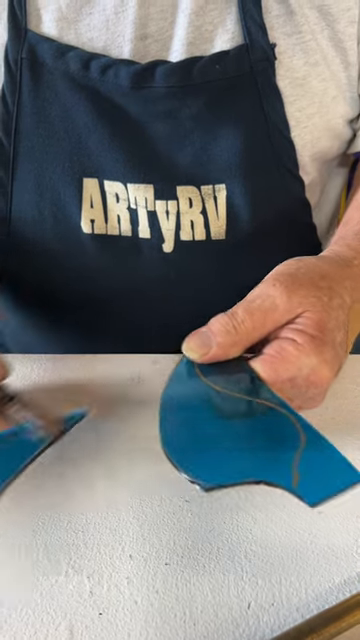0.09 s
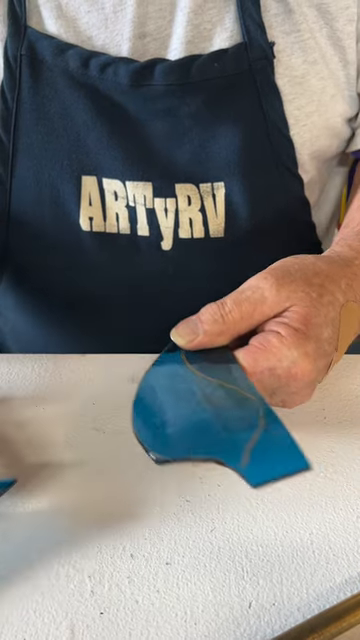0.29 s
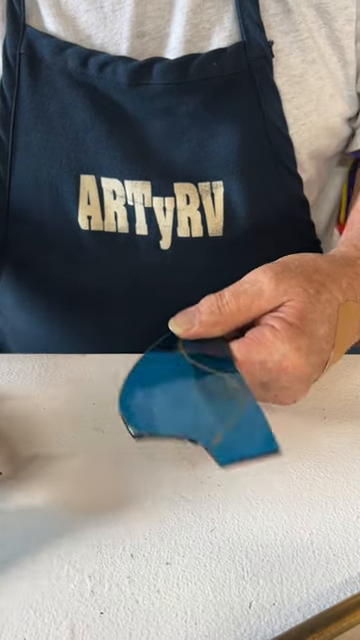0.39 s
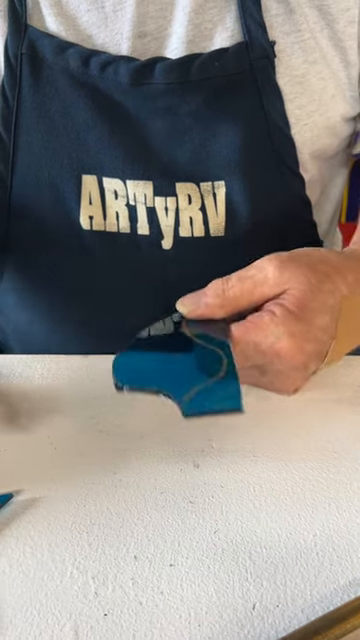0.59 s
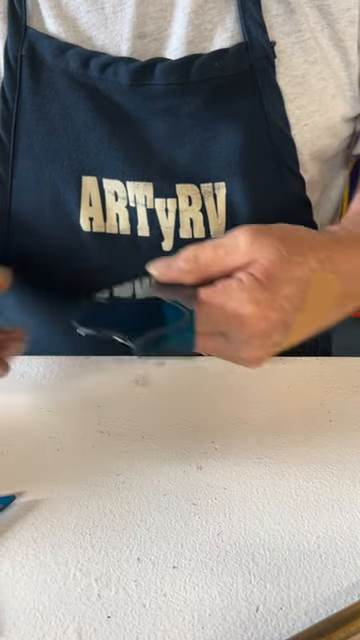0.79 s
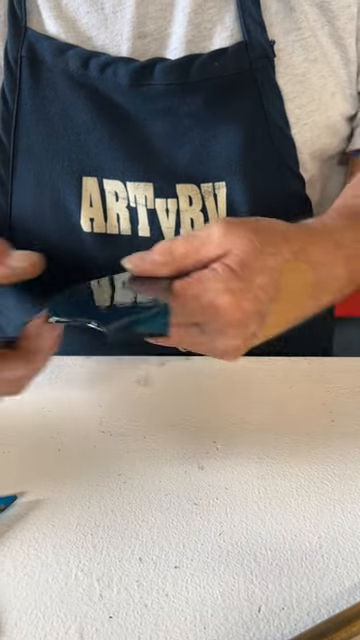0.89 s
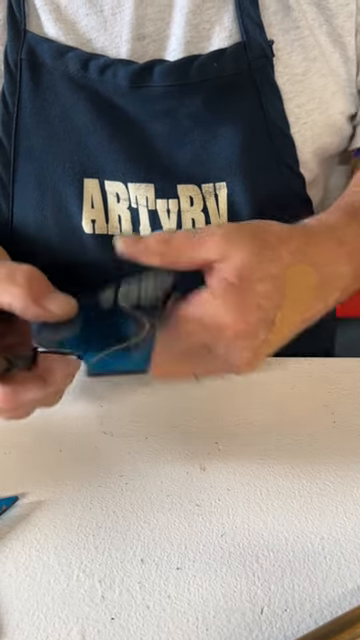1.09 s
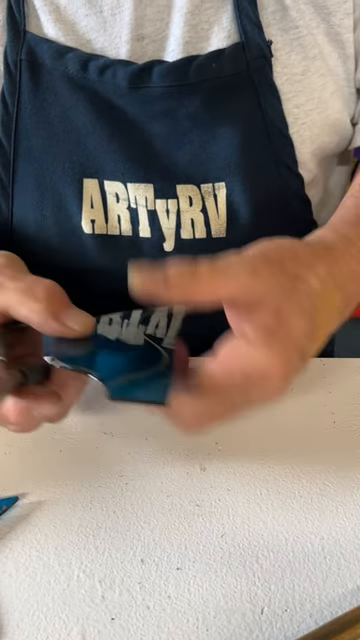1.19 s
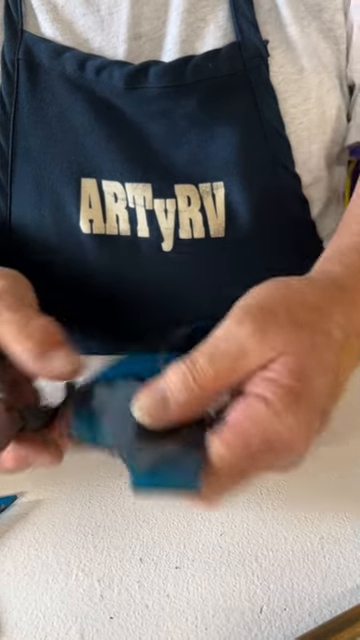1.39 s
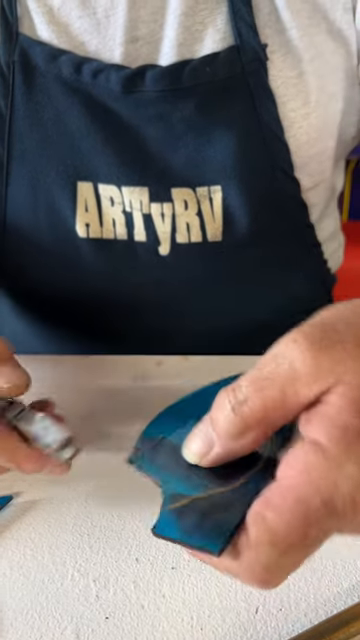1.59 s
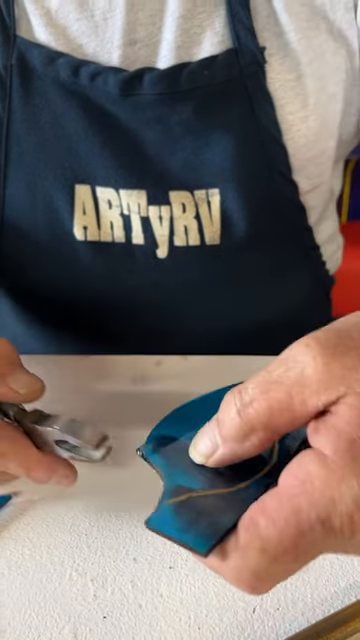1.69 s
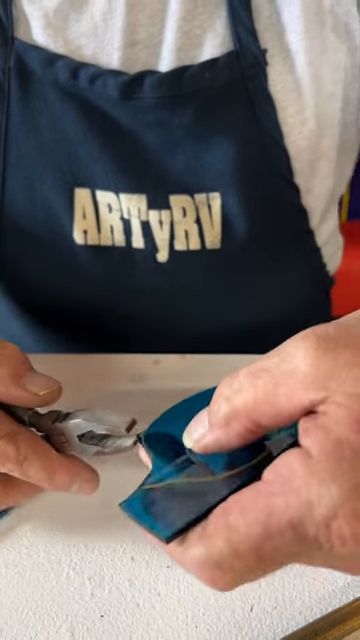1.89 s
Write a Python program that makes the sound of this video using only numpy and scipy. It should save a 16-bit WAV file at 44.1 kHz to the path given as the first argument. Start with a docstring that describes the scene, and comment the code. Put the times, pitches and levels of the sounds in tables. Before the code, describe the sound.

A piece of glass clatters onto a table, ringing and rattling, then pliers tick faintly.

```python
"""A live studio with a low hum. A snapped-off piece of sheet glass is put down on a work table: it lands,
rocks, chatters and settles. Each contact cracks, knocks the table and rings the glass in high modes; between
contacts the edge drags. Then fingers slide over the other piece with a soft hiss, it is tapped once, and the
pliers tick and squeak. A few faint contacts close the scene. Hands, tools and the room reflect the sound."""
import sys
import numpy as np
from scipy import signal
from scipy.fft import rfft, irfft, next_fast_len
from scipy.io import wavfile
from scipy.ndimage import uniform_filter1d, map_coordinates

SR = 44100
rng = np.random.default_rng(int(sys.argv[2]) if len(sys.argv) > 2 else 0)


def wav_record(signal):
    """Record a signal, one row per channel, as 16-bit PCM in the file named by sys.argv[1]."""
    frames = np.transpose(np.atleast_2d(signal))
    bounded = np.clip(frames, -1, 1)
    # unit amplitude maps onto the largest positive 16-bit level
    quanta = np.round(bounded * 32767).astype(np.int16)
    wavfile.write(sys.argv[1], SR, quanta)


N = 83790

# noise spectra: freq_hz, density_db
HUM_SPECTRUM = [(15, -59), (25, -24.5), (75, -7.5), (117, -8.5), (244, -16), (310, -23.5), (388, -33.5),
                (605, -32.5), (1500, -45.5), (1950, -81), (3300, -120)]
SLIDE_TREBLE = [(6000, -30), (6600, -15), (7300, -10.5), (7550, -7), (7900, -4.5), (8400, -10.5),
                (8900, -2), (9500, -13.5), (10400, -9.5), (10880, -7.5), (11300, -17.5), (12500, -40.5)]
SLIDE_MIDDLE = [(710, -49.5), (1200, -22), (2070, -3), (2990, -8.5), (3610, -7), (4080, -7), (6500, -11.5),
                (8450, -51)]
CRACK_SPECTRUM = [(400, -7), (1500, -6), (4000, -2.5), (9000, -1.5), (12000, -2), (16000, -17.5)]
# fingers on glass and cloth: time_s, treble_db, middle_db
SLIDE_LEVELS = [(0, -88, -87), (0.199, -80, -76.5), (.9, -89, -74), (0.999, -93, -87), (1.04, -67, -72),
                (1.2, -74.5, -74.5), (1.36, -76.5, -75), (1.389, -86, -76), (1.5, -83.5, -75),
                (1.58, -93.5, -83.5), (1.74, -90, -82.5), (1.755, -82.5, -71), (1.82, -78, -73.5),
                (1.9, -67, -67.5)]
# pliers: centre_s, half_length_s, pitch_hz, level_db
SQUEAKS = [(.01, .03, 2350, -79), (0.215, 0.0056, 2340, -69.5), (1.033, 0.035, 3850, -68.5),
           (1.481, 0.058, 4990, -79), (1.811, 0.04, 4970, -64.5)]
# tool on glass: start_s, click_gain_db, ring_hz, ring_db, t60_s, click_width_oct
TICKS = [(0.094, -45, 2270, -48.5, 0.058, 2.5), (0.096, -63, 14340, -62, 0.048, .6),
         (.203, -61.5, 5580, -63, 0.039, .6), (1.055, -45.5, 4784, -61, 0.017, 1.5),
         (1.221, -49, 3560, -56.5, 0.016, 0.53), (1.443, -55, 2615, -67.5, 0.026, 1.33),
         (1.752, -50, 7290, -48, 0.011, 1.9)]
# dragging edge: time_s, level_db
SCRAPE_LEVELS = [(0.236, -52.5), (.247, -36.5), (0.261, -34), (0.271, -26.5), (.29, -47.5), (.32, -43),
                 (0.334, -36), (0.388, -28.5), (.425, -30.5), (0.441, -49), (0.471, -55.5), (0.489, -32.5),
                 (.52, -40), (0.549, -27.5), (0.598, -37), (0.641, -53.5)]
# glass meets table: start_s, crack_db, thud_db, knock_db, low_db, main_db, high_db, t60_ratio, rise_ms
CONTACTS = [ (0.2379, -5.5, -21, -36.5, -31.5, -36.5, -29.5, 0.44, 0.2),
            (0.245, -27, -40, -42, -31.5, -26, -34, 0.97, 1.5),
            (0.2609, -16.5, -38.5, -34, -27, -23.5, -24, 0.67, 2),
            (0.2653, -6, -27, -38, -24.5, -13, -14, 0.53, 0.73),
            (0.2683, -12.5, -40, -35.5, -21, -17.5, -12.5, 0.21, 1.3),
            (0.2729, -11.5, -28.5, -25.5, -32.5, -28, -20.5, 0.23, 0.2),
            (0.3066, -40, -49.5, -45, -42.5, -33.5, -40, 0.35, 1.1),
            (0.3185, -36, -53, -43.5, -43.5, -32.5, -37.5, 0.44, 1.2),
            (0.328, -15, -45, -30, -35.5, -21, -24.5, 0.65, 0.17),
            (.3370, -19.5, -43, -30, -29, -22, -25.5, 0.76, 0.63),
            (0.359, -20, -36, -36, -41.5, -19.5, -22.5, 0.54, 0.22),
            (.3750, -5, -39.5, -22.5, -22.5, -21, -26, 0.41, 0.12),
            (.3880, -13.5, -36, -29.5, -33, -17, -20, 0.62, 0.37),
            (.3990, -20, -42, -36, -26.5, -20, -21, 0.67, 0.66),
            (0.414, -14.5, -39.5, -33, -33.5, -20.5, -25, .8, 0.28),
            (0.423, -20, -48.5, -39, -39, -24.5, -26, 0.38, 0.93),
            (.4300, -32, -44.5, -46, -45, -26.5, -35.5, 0.6, 0.93),
            (0.474, -10, -32.5, -22, -30, -31.5, -30, 0.34, 0.086),
            (0.4814, -1, -42, -35, -23.5, -20.5, -15, 0.13, 0.46),
            (0.4858, 4, -37.5, -36, -23, -14, -11, 0.26, 1.25),
            (.4970, -31, -37.5, -45, -27, -24, -26, 1, 0.64),
            (0.529, -26.5, -50.5, -38, -31, -35.5, -28, .6, .3),
            (0.5339, -4.5, -25, -17.5, -22.5, -30, -26.5, 0.55, 0.26),
            (0.55, -16.5, -35, -30.5, -30, -27.5, -30, 0.34, 0.15),
            (.5760, -16, -43.5, -32, -36.5, -50.5, -33.5, 0.27, 0.59),
            (.5960, -27.5, -39, -31, -42.5, -61, -36.5, .5, 0.38),
            (0.616, -23.5, -41, -41.5, -55, -55, -34.5, 0.15, 0.31),
            (1.836, -58, -73, -57.5, -67, -65, -54.5, .2, 1.4),
            (1.8515, -39, -53, -36.5, -65.5, -61, -53.5, 0.42, 1.13),
            (1.8587, -36.5, -42.5, -45, -79.5, -63.5, -51.5, 0.25, 0.5),
            (1.8820, -40, -63, -41.5, -64, -53, -47, 0.2, 2.7),
            (1.8905, -63, -54, -43, -74, -72, -71, .4, 4.1)]
# free modes of the laid piece, the table and the held piece: pitch_hz, level_db, t60_s
GLASS_LOW_MODES = [(1700, -15.5, 0.1), (2144, -12, .08), (2530, -10, .3), (3100, -14, .06),
                   (3900, -12, .25), (5205, -5.5, .3), (5350, -7, .06), (5570, -9, .045)]
GLASS_MAIN_MODES = [(6180, -0.5, 0.3), (6375, -10, 0.04)]
GLASS_HIGH_MODES = [(7500, -15, .06), (8160, -2, .13), (8230, -6, .08), (9350, 0, .2), (10510, -8, .09),
                    (11000, -16, .04), (12890, -6, .13), (13500, -17, .05), (14620, -8, .16)]
TABLE_MODES = [(420, -6, 0.026), (573, -8, .022), (662.5, 1, 0.034), (860, -5.5, 0.022), (1303, -6, 0.013),
               (1790, -9.5, 0.029)]
HELD_MODES = [(2850, -64, .05), (4900, -60, .04), (5400, -60, .05), (7540, -56, .045), (10880, -53, .04),
              (14700, -62, .025)]
HELD_LOW_MODE = [(1031, -54.5, .38)]
# colour of near sound and of reverb: freq_hz, gain_db
NEAR_COLOUR = [(40, -22), (110, 0), (11000, 0), (11500, -5), (12100, -17), (12600, -2), (13900, -7),
               (14500, 0), (15600, -3), (16300, -14)]
ROOM_COLOUR = [(120, -15), (500, -11.5), (2000, -13.5), (6000, -17), (11000, -17.5), (16000, -18)]
# direct sound balance: freq_hz, left_minus_right_db
BALANCE = [(60, .24), (240, .43), (950, .8), (3770, .23), (15000, .5)]
# reverb decay: freq_hz, t60_s
ROOM_DECAY = [(120, 0.99), (500, 0.69), (2000, 0.9), (6000, 0.6), (10000, .4), (12500, 0.21), (16000, .18)]
# left-right likeness: freq_hz, correlation
HUM_CORRELATION = [(60, 1), (240, 0.94), (950, -0.52), (3770, 0.82), (15000, 0.2)]
ROOM_CORRELATION = [(100, 1), (290, 1), (640, .3), (3000, 0.13), (10000, 0.15)]

CHATTER_DB, LOW_CHATTER_DB, CHATTER_PER_S = 4, 1.8, 240  # modes flutter as the edge brushes the table


def amp(db):
    return 10 ** (np.asarray(db) / 20)


def unit_rms(x):
    return x / np.sqrt(np.mean(x ** 2) + 1e-20)


def log_interp(points, hz):
    freq_hz, values = np.transpose(points)
    return np.interp(np.log(hz + 1), np.log(freq_hz + 1), values)


def filtered(x, response):
    size = next_fast_len(x.shape[-1] + 8192)
    return irfft(rfft(x, size) * response(np.fft.rfftfreq(size, 1 / SR)), size)[..., :x.shape[-1]]


def wobble(knots_per_s, size=N):
    knots = rng.standard_normal(int(size * knots_per_s / SR) + 4)
    return map_coordinates(knots, [np.arange(size) * knots_per_s / SR])


def add(track, start_s, sound):
    span = track[round(start_s * SR):][:len(sound)]
    span += sound[:len(span)]


def stereo(x, colour, correlation):
    """Two unrelated signals as mid and side, weighted for the given correlation."""
    angle = lambda hz: np.arccos(log_interp(correlation, hz)) / 2
    mid, side = filtered(x, lambda hz: amp(log_interp(colour, hz)) * [np.cos(angle(hz)), np.sin(angle(hz))])
    return np.array([mid + side, mid - side])


def patchy_noise(colour, correlation, patch_db=1.5):
    """Stereo noise, rms 1, with random gain patches in time and frequency."""
    bins = signal.stft(rng.standard_normal((2, N)), nperseg=512)[2]
    patches = uniform_filter1d(uniform_filter1d(rng.standard_normal(bins.shape[1:]), 6, 0), 8, 1)
    noise = signal.istft(bins * amp(patch_db * unit_rms(patches)), nperseg=512)[1][:, :N]
    return unit_rms(stereo(noise, colour, correlation))


def ring(modes, t, t60_ratio=1, flutter_db=0, detune=0, clock=None, scatter_db=.5):
    """Damped sines of alternating sign, level and pitch scattered per strike; clock bends the pitch."""
    hz, db, t60_s = np.transpose(modes)[:, :, None]
    db = db + scatter_db * rng.standard_normal(db.shape)
    hz = hz * (1 + detune * rng.standard_normal(hz.shape))
    db = db + flutter_db * np.array([wobble(CHATTER_PER_S, len(t)) for _ in modes])
    phase = 2 * np.pi * hz * (t if clock is None else clock) + np.pi * np.arange(len(hz))[:, None]
    return np.sum(amp(db - 60 * t / (t60_s * t60_ratio)) * np.sin(phase), axis=0)


def crack(t, centre_hz=1000, width_oct=20, gain_db=-9.5, t60_s=.017):
    """Hard contact: a fast-dying burst of coloured noise."""
    band = lambda hz: np.exp(-(np.log2((hz + 1) / centre_hz) / width_oct) ** 2)
    noise = filtered(rng.standard_normal(len(t)), lambda hz: amp(log_interp(CRACK_SPECTRUM, hz)) * band(hz))
    return unit_rms(noise) * amp(gain_db - 60 * t / t60_s)


def hum(level_db=-55):
    """Steady low noise of the studio."""
    return amp(level_db) * patchy_noise(HUM_SPECTRUM, HUM_CORRELATION)


def finger_slide(waver_db=1.5):
    """Skin moving over glass: two bands of soft, wavering hiss."""
    time_s, *levels_db = np.transpose(SLIDE_LEVELS)
    out = np.zeros((2, N))
    for band_db, colour in zip(levels_db, [SLIDE_TREBLE, SLIDE_MIDDLE]):
        envelope = amp(np.interp(np.arange(N) / SR, time_s, band_db) + waver_db * wobble(40))
        out += envelope * patchy_noise(colour, correlation=[(1000, .6)])
    return out


def plier_squeaks(width_hz=92):
    """Thin squeaks: narrow noise bands under flat-topped envelopes."""
    out, t = np.zeros(N), np.arange(N) / SR
    for centre_s, half_length_s, pitch_hz, level_db in SQUEAKS:
        tone = filtered(rng.standard_normal(N), lambda hz: np.exp(-((hz - pitch_hz) / width_hz) ** 2))
        out += amp(level_db) * unit_rms(tone) * np.exp(-((t - centre_s) / half_length_s) ** 4)
    return out


def plier_ticks():
    """Tool touches glass: a click and one fluttering mode."""
    out, t = np.zeros(N), np.arange(SR // 2) / SR
    for start_s, click_gain_db, ring_hz, ring_db, t60_s, width_oct in TICKS:
        click = amp(click_gain_db) * crack(t, ring_hz, width_oct)
        add(out, start_s, click + ring([(ring_hz, ring_db, t60_s)], t, flutter_db=CHATTER_DB))
    return out


def edge_scrape(width_hz=120, hiss_db=-13.5, hiss_top_hz=9050, grit_db=4):
    """The dragging edge feeds gritty noise to the modes of glass and table."""
    def body(hz):
        hiss = amp(hiss_db + log_interp(CRACK_SPECTRUM, hz)) / (1 + (hz / hiss_top_hz) ** 6)
        modes = TABLE_MODES + GLASS_LOW_MODES + GLASS_MAIN_MODES + GLASS_HIGH_MODES
        loss = 1j * hz * width_hz
        return hiss + sum(amp(db) * loss / (mode_hz ** 2 - hz ** 2 + loss) for mode_hz, db, _ in modes)

    time_s, level_db = np.transpose(SCRAPE_LEVELS)
    envelope = amp(np.interp(np.arange(N) / SR, time_s, level_db, left=-120, right=-120))
    grit = rng.standard_normal(N) * amp(grit_db * wobble(350))
    return envelope * unit_rms(filtered(grit, body))


def table_thud(t, start_hz=640, end_hz=155, fall_s=.0032, t60_s=.15):
    """The struck table top: a falling low note."""
    cycles = end_hz * t + (start_hz - end_hz) * fall_s * (1 - np.exp(-t / fall_s))
    return np.sin(2 * np.pi * cycles) * amp(-60 * t / t60_s)


def table_knock(t, bend_ratio=.6, fall_s=.0015):
    """The table's modes start sharp and drop to pitch."""
    bent_s = t + bend_ratio * fall_s * (1 - np.exp(-t / fall_s))
    return ring(TABLE_MODES, t, detune=.025, clock=bent_s, scatter_db=2)


def glass_contacts(damp_s=.003):
    """Each contact cracks, knocks the table, stills the old ring and starts a new one."""
    out, t = np.zeros(N), np.arange(SR // 8) / SR
    ends_s = [row[0] for row in CONTACTS[1:]] + [N / SR]
    for contact, end_s in zip(CONTACTS, ends_s):
        start_s, crack_db, thud_db, knock_db, low_db, main_db, high_db, t60_ratio, rise_ms = contact
        groups = [(low_db, GLASS_LOW_MODES, LOW_CHATTER_DB), (main_db, GLASS_MAIN_MODES, LOW_CHATTER_DB),
                  (high_db, GLASS_HIGH_MODES, CHATTER_DB)]
        glass = sum(amp(db) * ring(modes, t, t60_ratio, flutter_db, detune=.0025, scatter_db=2)
                    for db, modes, flutter_db in groups)
        glass *= np.exp(-np.maximum(t - (end_s - start_s), 0) / damp_s)
        strike = glass + amp(crack_db) * crack(t) + amp(knock_db) * table_knock(t)
        rise = 1 - np.exp(-1000 * t / rise_ms)
        add(out, start_s, rise * strike + amp(thud_db) * table_thud(t))
    return out


def held_glass_tap(start_s=1.052, rise_s=.00043, swell_s=.02):
    """One tap on the held piece: upper modes ring at once, the lowest swells in."""
    out, t = np.zeros(N), np.arange(SR // 2) / SR
    upper = ring(HELD_MODES, t, flutter_db=CHATTER_DB) * (1 - np.exp(-t / rise_s))
    lowest = ring(HELD_LOW_MODE, t) * (1 - np.exp(-t / swell_s))
    add(out, start_s, upper + lowest)
    return out


def direct_path(x, left_lag_s=22e-6):
    """Direct sound, slightly louder and later on the left."""
    side = np.array([[.5], [-.5]])
    gain = lambda hz: amp(side * log_interp(BALANCE, hz))
    return filtered(x, lambda hz: gain(hz) * np.exp(-2j * np.pi * hz * side * left_lag_s))


def near_reflections(x, gain_db=-14.5, t60_s=.03, low_cut_hz=600):
    """Brief scatter off hands and tools, opposite in sign left and right."""
    t = np.arange(SR // 20) / SR
    scatter = rng.standard_normal(len(t)) * amp(-60 * t / t60_s)
    echo = signal.fftconvolve(x, scatter / np.linalg.norm(scatter))[:N]
    return amp(gain_db) * filtered(echo, lambda hz: (hz / (hz - 1j * low_cut_hz)) ** 2) * [[1], [-1]]


def room_reverb(x, delay_samples=250):
    """The studio's tail: each frequency dies at its own rate."""
    hz, t, bins = signal.stft(rng.standard_normal((2, SR)), SR, nperseg=256)
    tail = signal.istft(bins * amp(-60 * t / log_interp(ROOM_DECAY, hz)[:, None]), SR, nperseg=256)[1]
    delayed = np.pad(x, (delay_samples, 0))[None]
    wet = signal.fftconvolve(delayed, tail / np.linalg.norm(tail[0]), axes=1)[:, :N]
    return stereo(wet, ROOM_COLOUR, ROOM_CORRELATION)


def scene():
    """Glass, table and pliers with their reflections, over finger hiss and hum."""
    sources = glass_contacts() + edge_scrape() + plier_ticks() + held_glass_tap() + plier_squeaks()
    near = filtered(sources, lambda hz: amp(log_interp(NEAR_COLOUR, hz)))
    return direct_path(near) + near_reflections(near) + room_reverb(near) + finger_slide() + hum()


def record(dry):
    """Brick-wall low-pass."""
    top_hz = 16800
    return filtered(dry, lambda hz: hz < top_hz)


dry = scene()
out = record(dry)
wav_record(out)
```